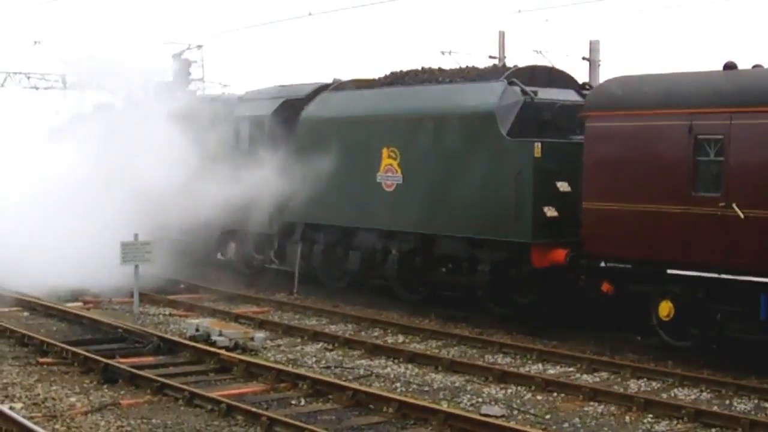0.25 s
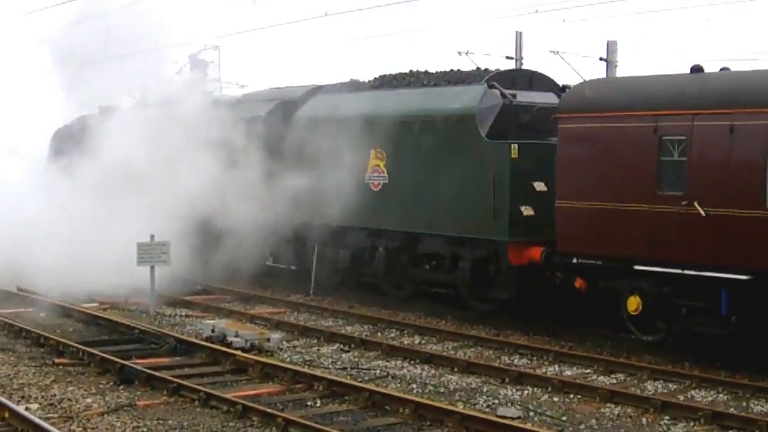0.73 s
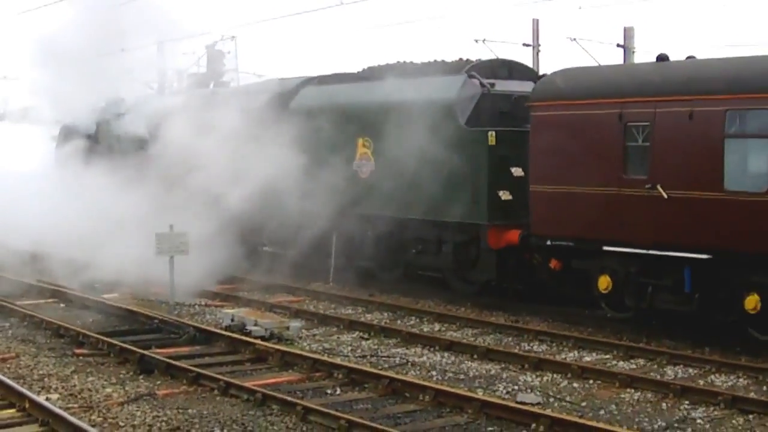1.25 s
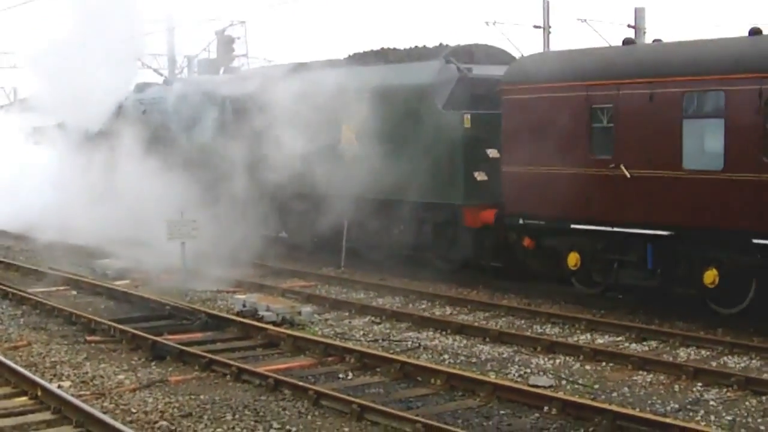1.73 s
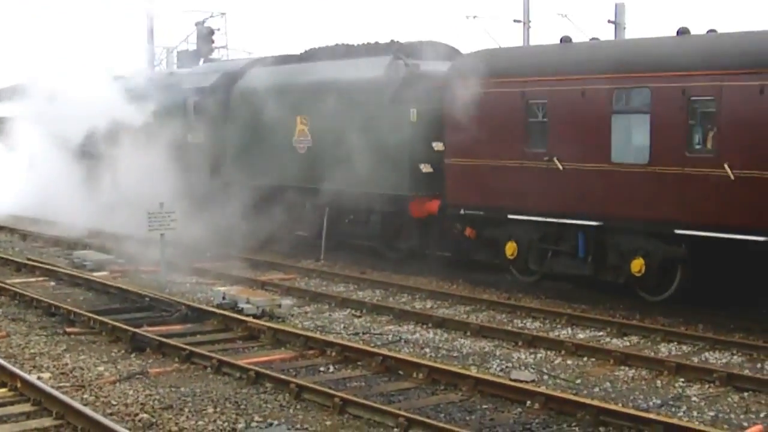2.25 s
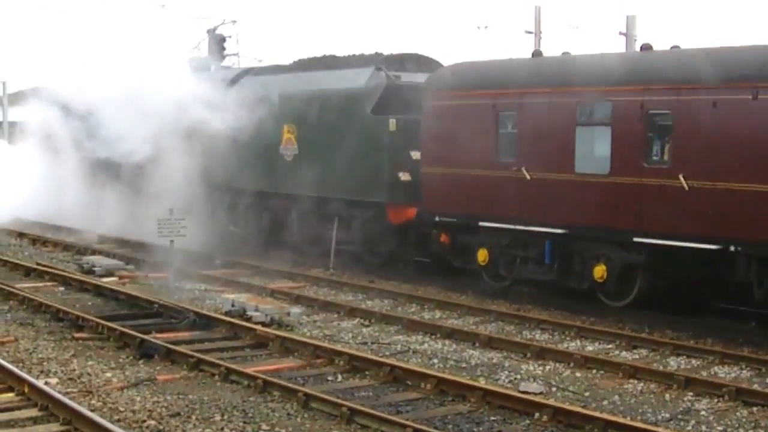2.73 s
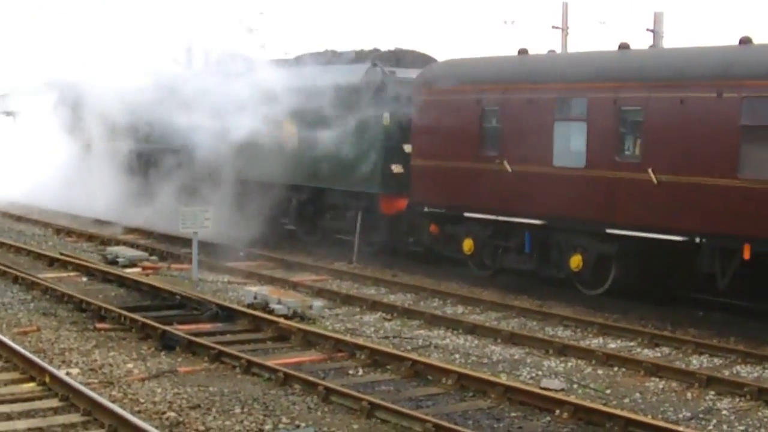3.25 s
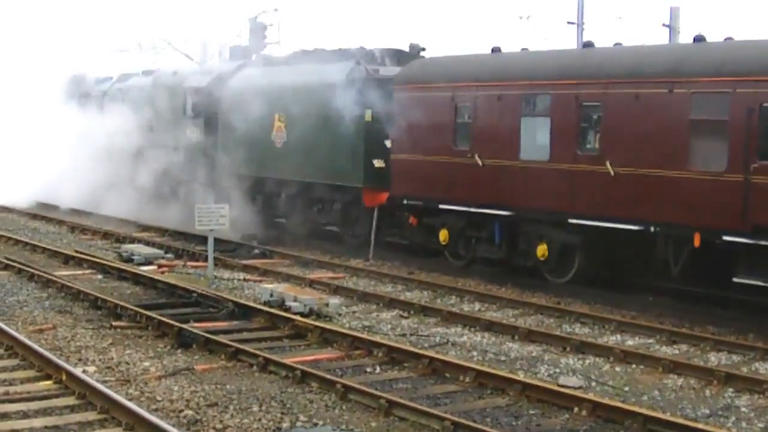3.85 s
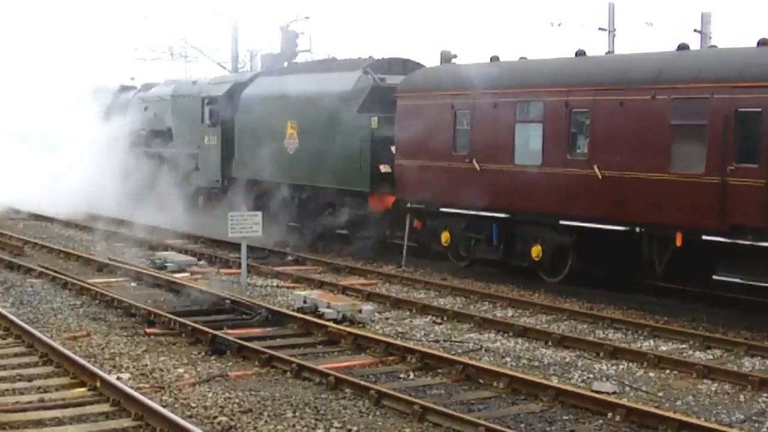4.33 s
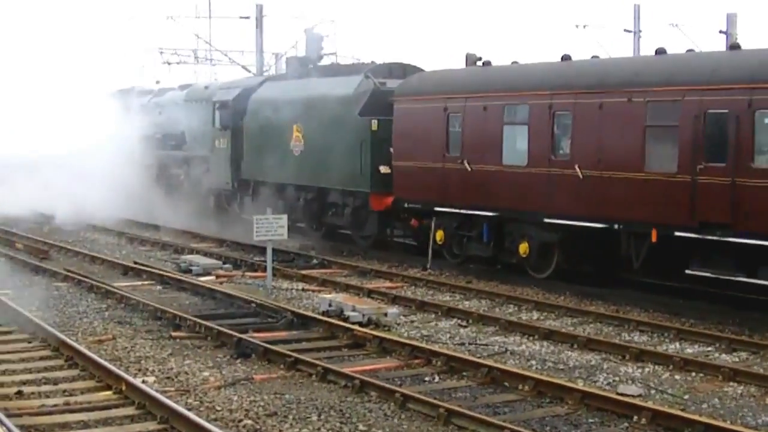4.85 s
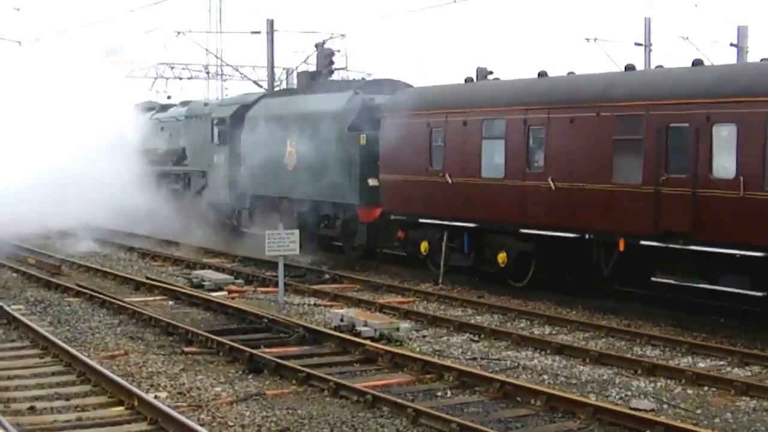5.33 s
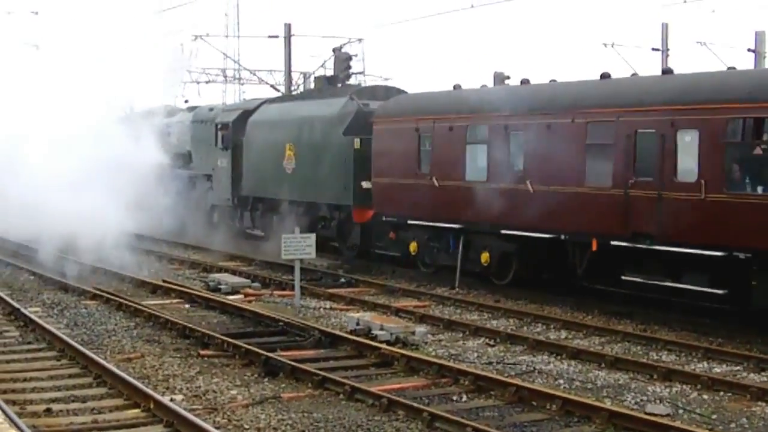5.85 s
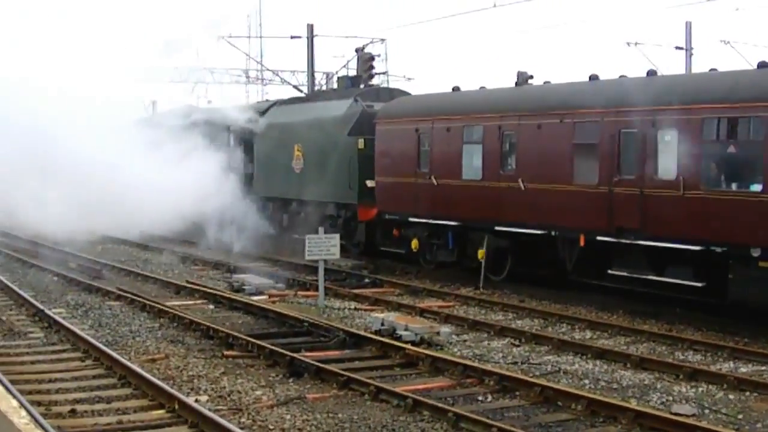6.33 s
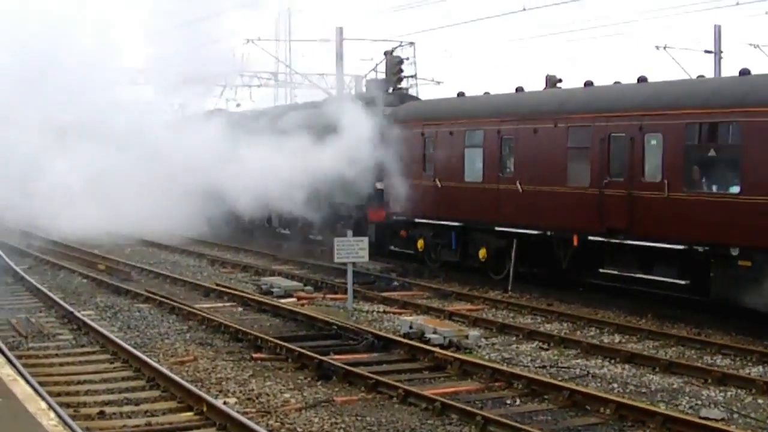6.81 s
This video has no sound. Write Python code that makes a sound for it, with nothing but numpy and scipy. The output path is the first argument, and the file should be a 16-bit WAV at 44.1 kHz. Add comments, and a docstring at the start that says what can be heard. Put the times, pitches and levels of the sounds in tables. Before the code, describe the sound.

Loud bright jets of steam hiss in long blasts above a constant leak, with muffled chuffs, pops, brief dropouts and one sharp crack.

```python
"""A steam locomotive draws slowly out of a station with its drain cocks open, over seven seconds.
From the start noise jets hiss and ring near 6 kHz over a rushing plume, in blasts above a continuous leak;
low rumble and soft exhaust chuffs of noise and random impulses lie underneath, and short sine bursts pop.
The overloaded microphone rumbles, rasps with squared hiss and cuts out for instants; narrow noise whistles
from 2.9 s, a pressure spike cracks loudly at 5.3 s, and the train's roll sinks towards the end."""
import sys
import numpy as np
from scipy import signal
from scipy.fft import rfft, irfft, next_fast_len
from scipy.io import wavfile
from scipy.ndimage import uniform_filter1d, minimum_filter1d, map_coordinates

SR = 44100
rng = np.random.default_rng(int(sys.argv[2]) if len(sys.argv) > 2 else 0)


def dump(signal):
    """Clip the signal to [-1, 1] and save it as 16-bit WAV at the path in sys.argv[1]."""
    limited = np.clip(np.atleast_2d(signal).T, -1, 1)
    pcm = np.round(limited * 32767).astype(np.int16)
    wavfile.write(sys.argv[1], SR, pcm)


N = 312228


def amp(db):
    """Decibels to gain."""
    return 10 ** (np.asarray(db) / 20)


def unit(x):
    """x at rms 1."""
    return x / np.sqrt(np.mean(x ** 2) + 1e-20)


def curves(rows):
    """One value per sample for each column after the time."""
    s, *columns = np.transpose(rows)
    return [np.interp(np.arange(N) / SR, s, column) for column in columns]


def bells(rows):
    """A curve with one bell for each (centre [s], height, half length to 1/e [s]) row."""
    t = np.arange(N) / SR
    out = np.zeros(N)
    for s, height, width_s in rows:
        near = slice(*np.searchsorted(t, [s - 4 * width_s, s + 4 * width_s]))
        out[near] += height * np.exp(-((t[near] - s) / width_s) ** 2)
    return out


def wobble(rate):
    """A smooth random curve, rate knots a second."""
    knots = rng.standard_normal(int(N * rate / SR) + 4)
    return map_coordinates(knots, [np.arange(N) * rate / SR])


def filtered(x, response):
    """x times a response of frequency."""
    size = next_fast_len(N + 8192)
    return irfft(rfft(x, size) * response(np.fft.rfftfreq(size, 1 / SR)), size)[:N]


def colour(x, spectrum, bumps=()):
    """x at rms 1 through a spectrum of (Hz, dB) points with bell-shaped resonances on top."""
    f, db = np.transpose(spectrum)

    def response(hz):
        lift = sum(g * np.exp(-((hz - centre) / width) ** 2) for centre, width, g in bumps)
        return amp(np.interp(np.log(hz + 1), np.log(f), db) + lift)

    return unit(filtered(x, response))


def turbulence(patchy_db):
    """White noise with drifting patches of stronger and weaker pitch regions."""
    z = signal.stft(rng.standard_normal(N), nperseg=512)[2]
    field = uniform_filter1d(rng.standard_normal(z.shape), size=5, axis=0)  # smooth across pitch
    field = uniform_filter1d(field, size=12, axis=1)  # and along time
    return signal.istft(z * amp(patchy_db * unit(field)), nperseg=512)[1][:N]


def steam_flow():
    """Levels in dB of hiss and plume: each blast builds, holds and dies away over the leak, with sudden sags."""
    # continuous escape of steam: (time [s], relative level [dB])
    leak_points = [(0, -13), (4.2, -16), (6.0, -21.5), (7.08, -14)]
    # one blast for each piston stroke:
    # (opens [s], closes [s], relative hiss [dB], relative plume [dB], release time constant [s])
    blasts = [(-.3, .64, -10, -21, 0.12), (1.195, 2.265, -9.6, -20, 0.29), (2.84, 3.735, -10, -21, 0.32),
              (4.533, 4.96, -12.5, -22.5, 0.14), (5.383, 5.666, -19.5, -28.5, .02),
              (6.087, 6.437, -14, -22.5, 0.013), (6.406, 6.964, -13, -21, 0.13)]
    # the hiss and plume sag and recover: (time [s], depth [dB], recovery [s])
    sags = [(.73, 10.5, 0.043), (2.555, 5.5, 0.095), (3.6, 5, 0.067), (4.235, 8.5, 0.075),
            (4.815, 6.5, .03), (5.354, 13, 0.066), (5.741, 10, 0.028)]
    hiss_open_s, plume_open_s, sag_onset_s = 0.11, 0.05, 0.016
    leak_plume_db = -8  # the leak's plume against its hiss

    t = np.arange(N) / SR
    leak, = curves(leak_points)
    hiss, plume = amp(leak) ** 2, amp(leak + leak_plume_db) ** 2  # powers
    for opens, closes, hiss_db, plume_db, release_s in blasts:
        held = np.exp(-np.maximum(t - closes, 0) / release_s)
        hiss = hiss + (amp(hiss_db) * np.clip((t - opens) / hiss_open_s, 0, 1) * held) ** 2
        plume = plume + (amp(plume_db) * np.clip((t - opens) / plume_open_s, 0, 1) * held) ** 2
    sag = np.zeros(N)
    for s, depth_db, recovery_s in sags:
        onset = np.clip(1 + (t - s) / sag_onset_s, 0, 1)
        sag += depth_db * onset * np.exp(-(np.maximum(t - s, 0) / recovery_s) ** 2)
    return 10 * np.log10(hiss) - sag, 10 * np.log10(plume) - sag


def weakness(hiss_level, full_db, range_db):
    """0 while the jets blow at full pressure, 1 when they only splutter."""
    return np.clip((full_db - hiss_level) / range_db, 0, 1)


def drain_cocks(hiss_level, plume_level, weak, hiss_db, plume_db, flutter_db, sputter_db,
                surge_db, weak_surge_db, billow_db):
    """Wet steam rings at the nozzles and rushes in the plume, surging less evenly at low pressure."""
    # spectrum of the hiss at the nozzles: (frequency [Hz], relative level [dB])
    jet = [(2500, -61.5), (4200, -23), (4700, -13), (5200, -6), (5550, -2.5), (5850, 0), (6200, -3.5),
           (6600, -9), (7300, -16), (8300, -20.5), (9600, -31.5), (12000, -38.5), (16000, -34)]
    # spectrum of the plume: (frequency [Hz], relative level [dB])
    plume_spectrum = [(100, -50.5), (400, -24), (800, -14), (1100, -10.5), (1500, -5), (2000, -2),
                      (2400, 0), (3000, 2.5), (4000, 2), (4800, -1.5), (6500, -6), (10000, -53)]
    # resonances of the plume among pipes and frames: (centre [Hz], width [Hz], lift [dB])
    pipes = [(1730, 140, 1.5), (2426, 20, 5), (3890, 50, 1)]

    surge = (surge_db + weak_surge_db * weak) * wobble(28)
    flutter = flutter_db * (wobble(60) + 0.89 * wobble(150))
    hiss_gain = amp(hiss_level + hiss_db + surge + flutter + sputter_db * wobble(600))
    plume_gain = amp(plume_level + plume_db + surge + billow_db * wobble(16) + 0.67 * flutter)
    hiss = colour(turbulence(patchy_db=1.0), jet) * hiss_gain
    plume = colour(turbulence(patchy_db=1.57), plume_spectrum, pipes) * plume_gain
    return hiss, plume


def rumble(hiss_level, overload_db, steep, lumpy_db):
    """The heavy train rolls; the overloaded microphone adds a lumpy rumble that grows faster than the hiss."""
    # roll of the train: (time [s], level [dB])
    train = [(0, -66), (3.7, -66), (4.6, -64), (7.08, -73)]
    # spectrum of the rumble: (frequency [Hz], relative level [dB])
    low_spectrum = [(15, -10), (30, 0), (70, -1), (120, 2), (250, -8), (800, -50)]

    roll, = curves(train)
    level = np.hypot(amp(roll), amp(steep * hiss_level + overload_db))
    return level * amp(lumpy_db * wobble(27)) * colour(rng.standard_normal(N), low_spectrum)


def chuffs(level_db, crackle_rate, crackle_share, lumpy_db):
    """Each exhaust beat is a soft rush full of small pressure bursts of uneven size."""
    # exhaust beats: (time [s], relative level [dB], half length [s])
    beats = [(.53, -47, 0.055), (.91, -35.5, 0.23), (1.363, -40.5, 0.11), (1.66, -38, 0.088),
             (1.882, -33.5, 0.019), (2.34, -35.5, 0.023), (2.502, -34.5, 0.077), (2.69, -38, 0.12),
             (2.9, -35, 0.11), (3.24, -36, 0.096), (3.447, -36, 0.11), (3.706, -32.5, 0.017),
             (3.85, -35, 0.077), (4.13, -37.5, 0.092), (4.398, -35, 0.023), (4.67, -39, 0.03),
             (4.934, -32.5, 0.033), (5.06, -37.5, 0.091), (5.309, -32.5, 0.05), (5.597, -38.5, 0.066),
             (5.73, -39, 0.033), (5.867, -39, 0.066), (6.265, -45, 0.1), (6.54, -35.5, 0.061)]
    # spectrum of the exhaust: (frequency [Hz], relative level [dB])
    exhaust_spectrum = [(40, -39), (110, -22.5), (170, -4.5), (220, 0), (300, -1.5), (400, 3), (550, 3.5),
                        (800, 2.5), (1300, 1), (2500, -6), (6000, -43)]
    draught_db = -46.5  # the chimney's steady rush, relative like the beats

    swell = bells([(s, amp(db), width_s) for s, db, width_s in beats])
    level = np.hypot(amp(draught_db), swell)
    bursts = (rng.random(N) < crackle_rate / SR) * rng.standard_normal(N)  # crackle_rate a second
    share = np.clip(crackle_share, 0, 1)  # of the power
    flow = np.sqrt(share) * unit(bursts) + np.sqrt(1 - share) * rng.standard_normal(N)
    return level * amp(level_db) * colour(flow * amp(lumpy_db * wobble(50)), exhaust_spectrum)


def rasp(hiss, level_db, width_s, between_db, flicker_db, fizz_db):
    """In brief flickers the microphone swings unevenly, which doubles the hiss an octave up and frays it."""
    # strongest flickers of overload: (time [s], relative level [dB])
    flickers = [(1.745, -18), (1.874, -13), (2.355, -16), (2.591, -14), (3.383, -17), (3.716, -13),
                (3.838, -11), (4.036, -13), (4.543, -16), (4.773, -21), (5.05, -20), (5.14, -17),
                (6.231, -18), (6.37, -18), (6.466, -11), (6.726, -20), (6.796, -17), (6.981, -14)]

    strong = bells([(s, amp(db + level_db), width_s) for s, db in flickers])
    faint = amp(between_db + flicker_db * np.tanh(wobble(80)))
    strength = np.sqrt(np.abs(uniform_filter1d(hiss ** 2, size=256)) + 1e-9)
    # squaring doubles the pitch; dividing by the strength keeps the level in step with the hiss
    frayed = hiss ** 2 / strength + amp(fizz_db) * strength * rng.standard_normal(N)
    return (strong + faint) * filtered(frayed, lambda hz: 1 / (1 + (7000 / (hz + 1)) ** 4))


def dropouts(weak):
    """Gain that collapses and recovers in brief gaps; random stutters join while the jets are weak."""
    # the sound cuts out: (start [s], length [s], depth [dB], level change just afterwards [dB])
    gaps = [(0.706, 0.011, 38, 1.5), (1.058, 0.0059, 14, 1), (1.136, 0.0075, 13.5, 3),
            (1.17, 0.015, 10.5, 0), (2.349, 0.011, 18, 1), (2.577, 0.007, 23, 7.5), (2.769, .014, 27.5, 1),
            (3.695, 0.014, 14.5, 1), (3.846, 0.03, 32.5, 1.5), (3.925, 0.0065, 32, 5),
            (3.985, 0.0097, 39, -2.5), (4.082, 0.0053, 58, 2), (4.114, 0.012, 19, 3),
            (4.232, 0.012, 34, -7), (4.249, 0.006, 13, 6), (4.313, 0.025, 44, 4), (4.396, .016, 53, 3),
            (4.415, 0.027, 72, 0), (4.516, 0.011, 47, 2.5), (4.547, 0.0073, 25, 4), (5.12, 0.013, 41, 1),
            (5.154, 0.011, 28, 6), (5.193, 0.0051, 26, 7.5), (5.256, 0.0077, 30, 2),
            (5.307, 0.039, 54, 2.5), (5.685, 0.042, 53, 9.5), (5.851, 0.0078, 27, -2),
            (5.991, 0.0058, 37, 2), (6.08, 0.007, 24, 6.5), (6.317, 0.0092, 38.5, 1),
            (6.399, 0.009, 28.5, 2), (6.805, .022, 11.5, -3.5)]
    stutters_per_s, stutter_s, stutter_db = 3.5, 0.0058, 16.5  # the rate holds at full weakness
    rebound_s, collapse_share = 0.0059, 0.49  # half length of the rebound; share of a gap spent falling

    t, db = np.arange(N) / SR, np.zeros(N)
    stutter_times = t[rng.random(N) < weak * stutters_per_s / SR]
    stutters = [(s, stutter_s, stutter_db, 0) for s in stutter_times]
    for start, length, depth, _ in gaps + stutters:
        gap = slice(*np.searchsorted(t, [start, start + length]))
        closed = np.interp((t[gap] - start) / length, [0, np.clip(collapse_share, 0, 1), 1], [0, 1, 0])
        db[gap] -= depth * np.sin(np.pi / 2 * closed) ** .65
    rebounds = [(start + length + rebound_s, rebound, rebound_s) for start, length, _, rebound in gaps]
    return amp(db + bells(rebounds))


def pops(cycles, fall, level_db):
    """The loudest exhaust bursts swell and die within a few cycles, falling in pitch."""
    # sharpest pops: (time [s], relative peak [dB], nominal pitch [Hz])
    bursts = [(0.852, -34, 494), (.92, -23, 470), (.934, -18, 523), (1.187, -18, 734), (1.435, -17, 910),
              (2.927, -13.5, 620), (3.48, -16.5, 666), (4.933, -21, 600), (4.9897, -6, 1520),
              (5.092, -21, 617), (5.3747, -14.5, 1630), (5.39, -18, 1500), (5.731, -21, 1740),
              (5.914, -24, 560)]

    out, t = np.zeros(N + SR), np.arange(SR // 20) / SR
    for s, db, hz in bursts:
        age = t * hz / cycles  # the swell peaks at age 1
        turns = hz * t * (1 + 2 * fall) / (1 + fall * np.sqrt(age) * 2)
        burst = age * np.exp(1 - age) * np.sin(2 * np.pi * turns)
        out[round(s * SR):][:len(t)] += amp(db + level_db) * burst
    return out[:N]


def whistle(plume_level, centre_hz, width_hz, level_db, length_s):
    """Now and then a jet sings on an edge, as a narrow band of noise."""
    # brief whistles: (time [s], relative level [dB])
    notes = [(2.91, -1), (3.05, -1), (4.77, 2), (6.3, -1.5), (6.84, -1)]

    strength = bells([(s, amp(db), length_s) for s, db in notes])
    tone = filtered(rng.standard_normal(N), lambda hz: 1 / (1 + ((hz - centre_hz) / width_hz) ** 2))
    return unit(tone) * amp(plume_level + level_db) * strength


def crack(s, peak_db, width_s, snap_db, snap_width_s, snap_lead_s, fizz_db, ring_db, ring_hz, t60):
    """A bright snap, then a frayed spike of pressure between two troughs and a short low ring."""
    t = np.arange(N) / SR - s

    def spike(u):
        return (1 - 2 * u ** 2) * np.exp(-u ** 2)

    snap = spike((t + snap_lead_s) / snap_width_s)
    fizz = colour(rng.standard_normal(N), [(6000, -26), (12000, 0)]) * np.exp(-(t / (2 * width_s)) ** 2)
    after = np.maximum(t, 0)
    ring = -np.sin(2 * np.pi * ring_hz * after) * amp(-60 * after / t60)
    return amp(peak_db) * spike(t / width_s) + amp(snap_db) * snap + amp(fizz_db) * fizz + amp(ring_db) * ring


def scene():
    """Steam, exhaust, train and overload meet at one point, alike in both channels."""
    hiss_level, plume_level = steam_flow()
    weak = weakness(hiss_level, full_db=-7.5, range_db=8.5)
    hiss, plume = drain_cocks(hiss_level, plume_level, weak, hiss_db=-0.5, plume_db=-0.65, flutter_db=1.0,
                              sputter_db=1.22, surge_db=0.44, weak_surge_db=2.4, billow_db=0.73)
    low = rumble(hiss_level, overload_db=-50.5, steep=1.43, lumpy_db=1.0)
    exhaust = chuffs(level_db=3.5, crackle_rate=240, crackle_share=0.57, lumpy_db=2.0)
    exhaust = exhaust + pops(cycles=0.64, fall=0.09, level_db=-2.0)
    overload = rasp(hiss + plume, level_db=0.5, width_s=0.02, between_db=-31, flicker_db=15, fizz_db=-4.5)
    singing = whistle(plume_level, centre_hz=2980, width_hz=140, level_db=-3.0, length_s=0.052)
    bang = crack(s=5.3353, peak_db=2.5, width_s=0.00017, snap_db=-1.0, snap_width_s=0.00007,
                 snap_lead_s=0.00025, fizz_db=-10, ring_db=-7, ring_hz=650, t60=0.0064)
    steam = hiss + plume + singing
    mono = (steam + overload + exhaust + low) * dropouts(weak) + bang  # the gaps spare the crack
    return np.array([mono, mono])


def record(dry):
    """The microphone has two hollows; a fast limiter tames peaks above full scale, then a steep band limit."""
    # hollows in the microphone's response: (centre [Hz], width [Hz], gain at the centre [dB])
    hollows = [(299, 91, -17), (899, 120, -43)]
    top_hz = 15450

    def hollow(hz):
        response = 1
        for centre, width, db in hollows:
            band = 1j * hz * width / (centre * centre - hz * hz + 1j * hz * width)
            response = response * (1 - (1 - amp(db)) * band)
        return response

    heard = np.array([filtered(channel, hollow) for channel in dry])
    needed = 1 / np.maximum(np.abs(heard), 1)
    gain = uniform_filter1d(minimum_filter1d(needed, size=9), size=7)  # reaches a few samples ahead
    return np.array([filtered(channel, lambda hz: hz < top_hz) for channel in heard * gain])


dry = scene()
out = record(dry)
dump(out)
```